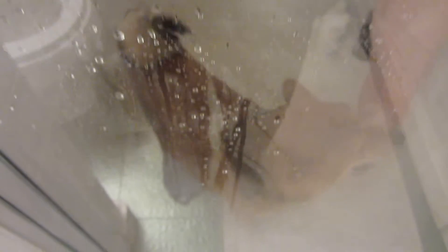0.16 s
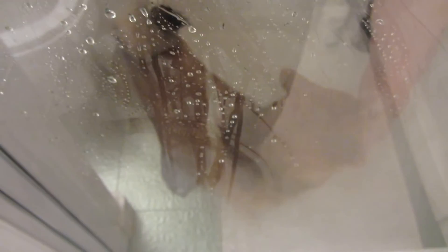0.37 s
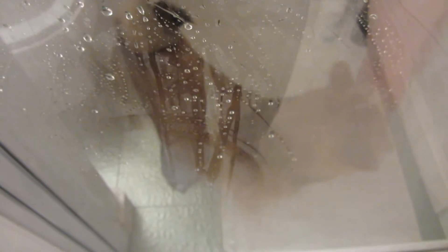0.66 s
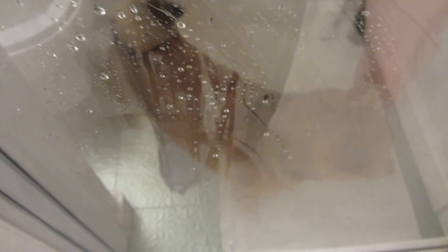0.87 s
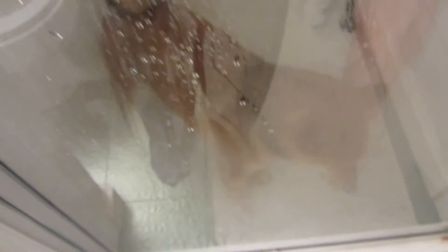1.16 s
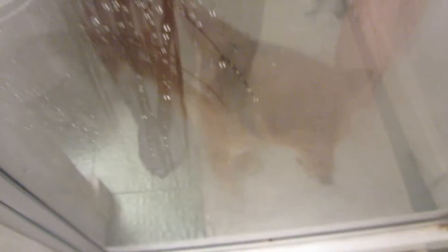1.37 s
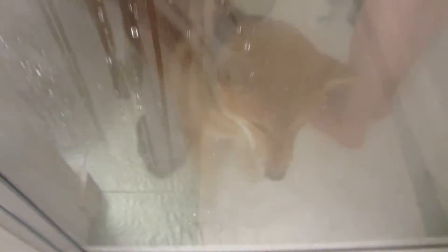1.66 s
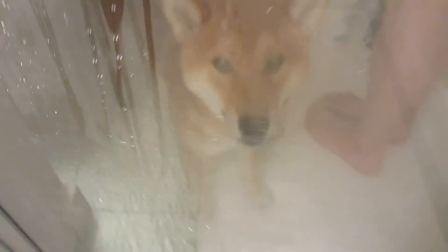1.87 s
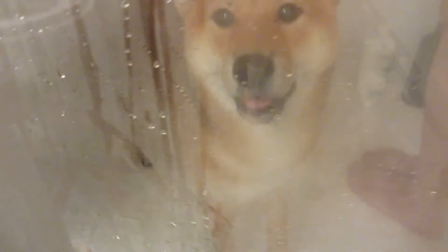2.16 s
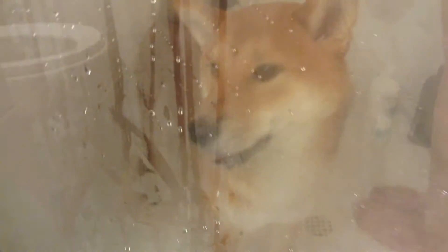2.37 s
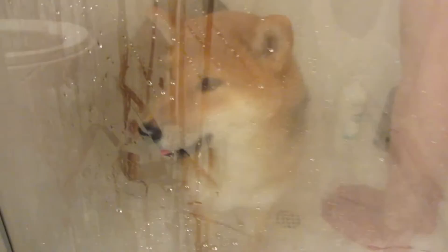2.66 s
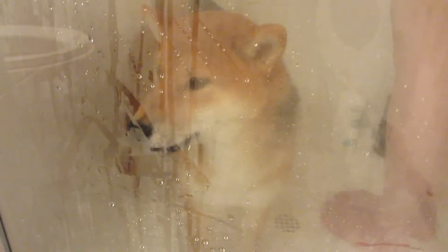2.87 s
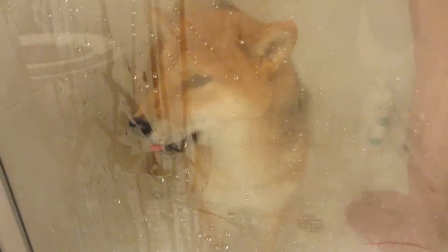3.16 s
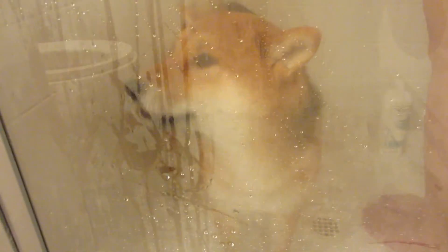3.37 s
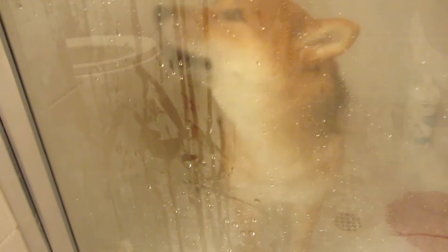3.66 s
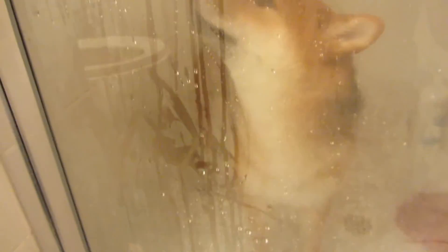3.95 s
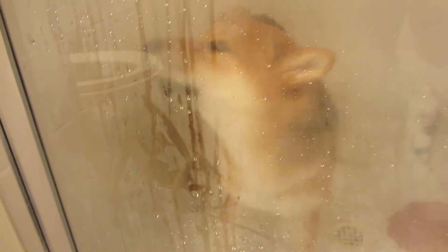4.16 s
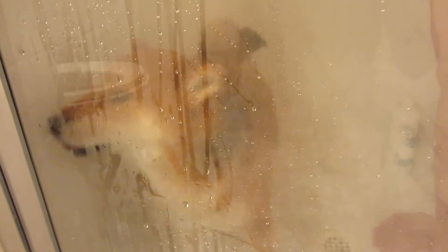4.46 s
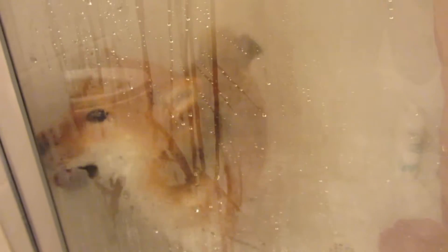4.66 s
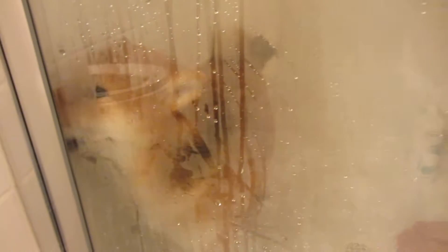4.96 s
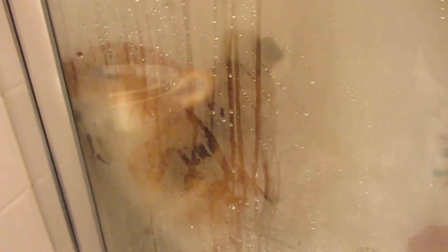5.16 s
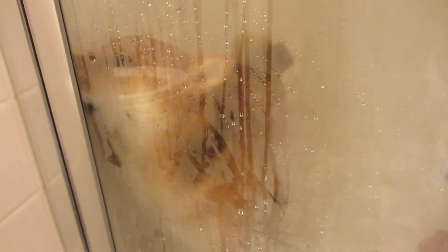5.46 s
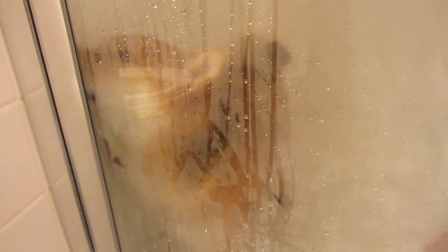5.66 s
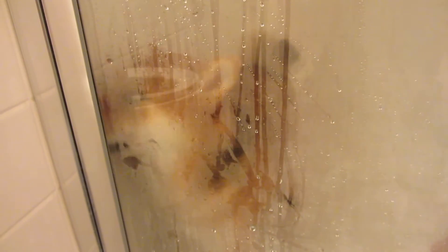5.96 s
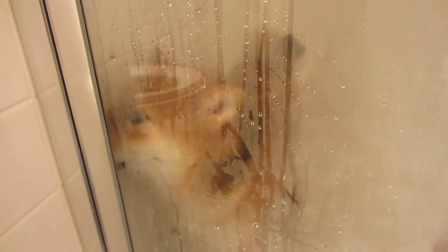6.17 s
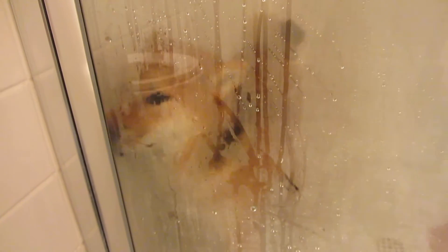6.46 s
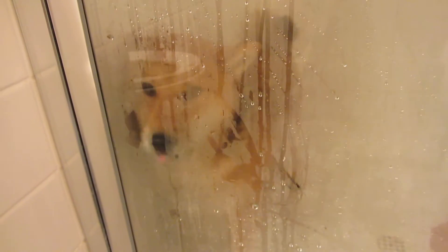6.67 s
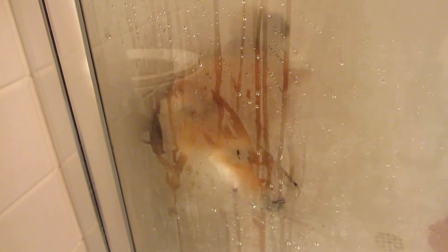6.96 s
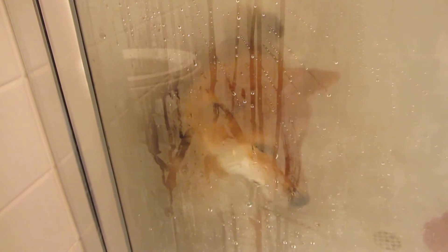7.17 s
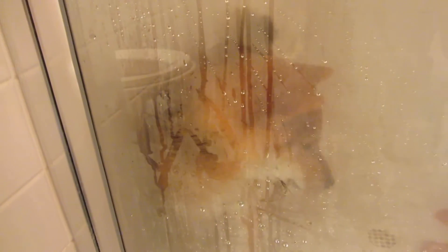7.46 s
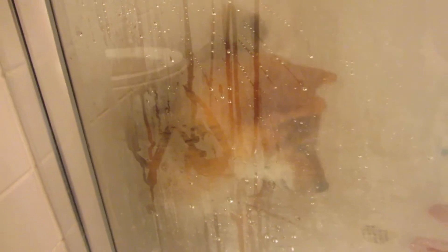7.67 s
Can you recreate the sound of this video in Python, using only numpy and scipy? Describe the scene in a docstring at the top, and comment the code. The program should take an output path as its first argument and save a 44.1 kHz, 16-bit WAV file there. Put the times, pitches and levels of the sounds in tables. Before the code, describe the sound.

A dog in a small tiled shower yelps in rapid, high, rising cries that ring off hard walls, pausing briefly twice, over a faint fan.

```python
"""A dog yelps in a tiled shower stall behind a glass door: short rising cries, some clear, some hoarse.
Each cry is a harmonic series from the vocal folds, weighted by throat resonances and mixed with breath noise;
it rings on as decaying stereo noise, the echoes between hard walls. Thin sine whistles come through the nose.
A fan rumbles (shaped noise) and hums (unsteady sines), water and huffs of breath hiss (shaped noise), a drop
ticks on the glass. The loudest sounds overload the microphone: gain control and a fast limiter press them down."""
import sys
import numpy as np
from scipy import signal
from scipy.fft import rfft, irfft, next_fast_len
from scipy.io import wavfile
from scipy.ndimage import uniform_filter1d, minimum_filter1d, map_coordinates

SR = 44100
rng = np.random.default_rng(int(sys.argv[2]) if len(sys.argv) > 2 else 0)


def master(y):
    """Save y as 16-bit WAV."""
    cut = np.clip(np.atleast_2d(y).T, -1, 1)
    pcm = np.round(cut * 32767)  # scale
    wavfile.write(sys.argv[1], SR, pcm.astype(np.int16))


N = 344417
TOP_HZ = 15720  # upper band limit


def amp(db):
    """Decibel definition: amplitude ratio of a level in dB."""
    return 10 ** (np.asarray(db) / 20)


def unit(x):
    """Normalization by power: x scaled to an rms of 1."""
    return x / np.sqrt(np.mean(x ** 2) + 1e-20)


def along(points, hz):
    """Logarithmic frequency scale: linear interpolation of (frequency [Hz], value) points over log frequency."""
    f, v = np.transpose(points)
    return np.interp(np.log(hz + 1), np.log(f + 1), v)


def wobble(rate, size):
    """Band-limited random fluctuation: a smooth curve through random knots, rate of them a second."""
    knots = rng.standard_normal(int(size * rate / SR) + 4)
    return map_coordinates(knots, [np.arange(size) * rate / SR])


def filtered(x, response):
    """Linear filtering: the spectrum of x times a response of frequency."""
    n = x.shape[-1]
    m = next_fast_len(n + 4096)
    return irfft(rfft(x, m) * response(np.fft.rfftfreq(m, 1 / SR)), m)[..., :n]


def spread(pair, alike):
    """Interaural coherence: two unrelated signals mixed as mid and side to a given left-right likeness."""
    def weights(hz):
        turn = np.arccos(np.clip(along(alike, hz), -1, 1)) / 2
        return np.array([np.cos(turn), np.sin(turn)])

    mid, side = filtered(pair, weights)
    return np.array([mid + side, mid - side])


def rush(spectrum, alike, patchy_db):
    """Turbulent noise: a shaped stereo spectrum of rms 1 whose patches in time and frequency vary in gain."""
    z = signal.stft(rng.standard_normal((2, N)), nperseg=512)[2]
    field = rng.standard_normal(z.shape[1:])
    field = uniform_filter1d(uniform_filter1d(field, 6, 0), 14, 1)  # smooth over frequency, then time
    pair = signal.istft(z * amp(patchy_db * unit(field)), nperseg=512)[1][:, :N]
    shaped = filtered(pair, lambda hz: amp(along(spectrum, hz)))
    return unit(spread(shaped, alike))


def gesture(s, first_hz, top_hz, last_hz, wait, rise, attack, held, whimper, db, mouth_db, hoarse, half,
            settled_db, sag_db):
    """Phonation control: rows of (time [s], pitch [Hz], level [dB], mouth opening [dB], hoarseness, half-pitch share)."""
    whimper = max(whimper, 0)
    t = np.arange(0, .44, .002)
    release_db_per_s, release_s = 698, .06
    end = held + release_s + whimper

    # pitch: the folds catch sharp, move to the top pitch, then drift to the last value
    catch, catch_s = .055, .012  # share of the first pitch, decay time
    rise_bend = .85  # below 1 the pitch moves fast at first
    drift_share, drift_bend = .45, 1.5  # time scale as share of the time left; above 1 starts late
    risen = np.clip((t - wait) / rise, 0, 1)
    since_top = t - wait - rise
    left = max(end - wait - rise, .01)
    drift = 1 - np.exp(-(np.maximum(since_top, 0) / (drift_share * left)) ** drift_bend)
    hz = first_hz * (1 + catch * np.exp(-t / catch_s))
    hz = hz + (top_hz - first_hz) * risen ** rise_bend + (last_hz - top_hz) * drift

    # level: attack, sagging hold, then a steep fall or a softer whimper
    onset_db = 26.5  # depth of the attack
    whimper_db, whimper_fade_db = 18.5, 19.5  # drop into the whimper, further loss by its end
    after = np.maximum(t - held, 0)
    fall_db = release_db_per_s * after
    if whimper > .01:
        whimper_fall_db = whimper_db + whimper_fade_db * (after / (end - held)) ** 2
        whimper_fall_db = whimper_fall_db + release_db_per_s * np.maximum(t - end, 0)
        fall_db = np.minimum(fall_db, whimper_fall_db)
    level = db - onset_db * np.maximum(1 - t / attack, 0) ** 2
    level = level - sag_db * np.clip(t - attack, 0, held) - fall_db
    level = level + wobble(35, SR)[::SR // 500][:len(t)]  # unsteady breath, in dB

    # mouth: gapes at first, changes its overtones at the top, closes towards the end of the hold
    gape_db, gape_s, close_db, close_s = 4, 0.011, 5, 0.061
    settled = np.clip(since_top / 0.018, 0, 1)
    closed = np.clip(1 + (t - held) / close_s, 0, 1)
    mouth = mouth_db + gape_db * np.exp(-t / gape_s) - settled_db * settled - close_db * closed

    clear_start = 0.58  # share of the roughness before the pitch has risen
    strain = clear_start + (1 - clear_start) * risen
    return np.transpose([s + t, hz, level, mouth, hoarse * strain, half * risen])


def cry(rows, slope_db, treble_db, length):
    """Source-filter principle: fold harmonics and breath noise through the throat; flutter and subharmonics roughen."""
    # throat resonances: (frequency at length ratio 1 [Hz], gain [dB])
    throat_points = [(100, -61.5), (300, -24), (450, -7.5), (600, 0.5), (1000, 1.5), (1500, -0.5),
                     (2500, 5.5), (3300, -3), (4200, -26.5), (5100, -31), (6200, -32), (8000, -38.5),
                     (10500, -48.5), (12000, -60.5), (14000, -64), (16000, -66)]
    # breath hissing past the teeth: (frequency [Hz], relative level per Hz [dB])
    rasp_points = [(3000, -31.5), (4200, -1), (7000, -1.5), (10300, -9.5), (11300, -22.5), (14000, -24),
                   (15500, -35.5)]
    s, *cols = np.transpose(rows)
    t = np.arange(s[0], s[-1], 1 / SR)
    hz, db, mouth_db, hoarse, half = (np.interp(t, s, c) for c in cols)
    hoarse = np.clip(hoarse, 0, 1)
    phase = 2 * np.pi * np.cumsum(hz) / SR
    wander = 2 * np.pi * np.cumsum(hz * 0.15 * hoarse * wobble(220, len(t))) / SR

    # harmonic numbers in half steps; the halves appear when every second beat differs
    k = np.arange(1, 50)[:, None] / 2
    share = np.where(k % 1, np.abs(half) * (k > 1), 1)
    loudest_db = np.maximum.accumulate(db)
    effort_db = 0.47 * (loudest_db + 12.5) * np.log2(np.maximum(k / 2, 1))  # dull until the cry has built up
    treble = along([(3600, 0), (4300, 1)], k * hz * length)  # above the muzzle's cut-off
    facing_db = slope_db * np.log2(np.clip(k / 2, 1, 3)) + treble_db * treble
    fading_db = 0.18 * (loudest_db - db) * treble  # the thin treble outlasts the body of the cry
    throat_db = along(throat_points, k * hz * length)
    gain = share * amp(throat_db + mouth_db * (k > 1) + effort_db + facing_db + fading_db)
    gain *= k * hz < TOP_HZ
    gain *= amp(3.5 * rng.standard_normal(k.shape) * (k > 4))  # high overtones come out uneven

    flutter = np.where(k > 1, 1, .25) * wander  # the lowest tone gets a quarter of the pitch flutter
    partials = gain * np.sin(k * (phase + flutter) + 0.35 * k ** 2)
    tone = np.sum(partials, axis=0) * np.sqrt(2 / np.sum(gain ** 2, axis=0))  # about rms 1
    tone *= amp(8.5 * hoarse * wobble(350, len(t)))

    puffs = rng.standard_normal(len(t)) * (1 + np.cos(phase + wander))  # turbulence puffs once a cycle
    rasp = amp(-41 + mouth_db / 3) * unit(filtered(puffs, lambda f: amp(along(rasp_points, f))))
    tilt = [(500, -16.0), (1500, 5.0)]  # (frequency [Hz], gain [dB])
    air = unit(filtered(puffs, lambda f: amp(along(throat_points, f * length) + along(tilt, f))))
    burst = 0.66 * amp(-60 * (t - s[0]) / 0.06)  # the folds part with a puff of air
    air_gain = 0.19 * hoarse * amp(mouth_db / 2) + burst
    voice = np.sqrt(1 - hoarse ** 2) * tone + air_gain * air + rasp
    return amp(db) * voice * np.minimum((t - s[0]) / .002, 1)


def in_stall(out, s, x, direct_db):
    """Reverberation: out plus x and its decaying diffuse echoes; the dog moves, so every call draws new echoes."""
    # decay in the stall: (frequency [Hz], time to fall by 60 dB [s])
    decay_points = [(300, 0.47), (1000, 0.36), (3000, 0.28), (6000, 0.37), (10000, 0.28)]
    # left-right likeness of the echoes: (frequency [Hz], correlation [-1 to 1])
    echo_likeness = [(300, 0.81), (800, 0.68), (2000, 0.26), (5000, -.1)]
    hz, t, z = signal.stft(rng.standard_normal((2, SR * 3 // 4)), SR, nperseg=256)
    decay = amp(-60 * t / along(decay_points, hz)[:, None])
    tail = signal.istft(z * decay, SR, nperseg=256)[1]
    tail = spread(tail / np.linalg.norm(tail[0]), echo_likeness)
    tail[:, 0] += amp(direct_db)  # direct sound
    wet = signal.fftconvolve(x[None], tail, axes=1)
    start = round(s * SR)
    padding = ((0, 0), (start, max(N - start - wet.shape[1], 0)))
    return out + np.pad(wet, padding)[:, :N]


def dog_cries():
    """Superposition: the fading echo of an earlier cry, then the cries, each ringing in the stall."""
    # one row per cry; the first, at 0 s, is the fading echo of a cry before the start:
    #   (start [s], first pitch [Hz], top pitch [Hz], last pitch [Hz], wait before the rise [s],
    #   rise [s], attack [s], held until after the start [s], whimper length [s], level [dB],
    #   mouth opening as overtone gain [dB], hoarseness [0-1], half-pitch share [0-1],
    #   overtone slope [dB per octave], treble gain above the muzzle's cut-off [dB], throat length [ratio],
    #   overtone loss once at the top [dB], sag while held [dB per s])
    cry_rows = [ (0, 747, 689, 684, .002, 0.0033, 0.0029, .003, 0, -26.5, -17, 0, 1, 6.5, 9.5, 0.98, -1, 45),
                (0.186, 811.4, 1085, 978, .028, .045, 0.042, 0.11, .17, -14, 3.5, .25, 0, 5.5, -3.5, 1.01, 18, 61.5),
                (.565, 819.5, 958.8, 1003, .025, .025, 0.046, 0.083, 0.17, -13.5, -2.5, .06, 0, 7, -4.5, 0.97, 2, 11),
                (0.971, 823, 959, 995, 0.031, 0.042, 0.047, .09, 0.15, -10, -6, 0.1, 0, 5, -4, 1.016, 3, 90.5),
                (1.32, 789.6, 961.6, 711.6, .035, .04, 0.041, .105, 0.22, -12, -2.5, .05, .05, 2.5, -1.5, 0.99, 18.5, 29.5),
                (1.598, 738, 688, 592, 0.023, 0.04, 0.074, 0.1, .1, -33.5, -19, 0.11, 0.3, 12, 17, 1.2, 8, 42),
                (1.953, 461.4, 425, 371, 0.0185, 0.0336, 0.013, 0.123, 0.036, -41, -11, 0.2, 0.36, 1.5, 7, 0.76, 3, 63),
                (2.384, 449.4, 477.4, 438, .04, 0.041, 0.025, 0.073, 0, -24, 1, 0.13, 0.23, 0.5, 9, 0.94, 7.5, 67.5),
                (2.781, 566.6, 804.6, 789, .022, .1, 0.058, 0.11, 0.063, -12, 6, .32, 0.17, -5.5, 6, 0.93, 2.5, 53),
                (2.97, 695.3, 829.5, 841, .005, 0.087, 0.057, 0.1, 0.065, -12.5, -1, .08, 0.07, -2, 10, 0.98, 0.5, 19),
                (3.273, 771.6, 1158, 1110, .035, .045, 0.044, 0.14, 0.075, -8, -1.5, .24, 0.1, 4, -4, 1.028, 19, 76),
                (3.501, 730.5, 800, 738.6, 0.0093, .09, 0.064, .145, 0.022, -24, -6, 0.2, 0.02, 5, 5, .93, -1, 53),
                (3.815, 815.8, 1059, 988.5, .048, .02, 0.053, 0.13, 0, -9.5, 0.5, .2, 0.3, .5, 1, 1.04, 13, 70.5),
                (4.027, 777, 856, 817, 0.029, .05, 0.051, 0.1, 0.18, -14.5, 12.5, 0.11, 0, -12.5, 12.5, 0.84, 2.5, 59.5),
                (4.319, 875, 1023, 1007, .022, .07, 0.044, 0.11, 0.089, -10, -5, 0.3, 0.6, 4, -2.5, 1.07, 12.5, 41.5),
                (4.681, 801, 1047, 1039, .024, .04, 0.041, 0.071, 0, -8, -5, .18, 0, 0.5, -4, .99, 1, 18.5),
                (4.969, 720.4, 823.3, 763, .04, 0.049, 0.061, 0.12, 0, -13, -8, .07, 0.01, -0.5, 2, 1.07, 3, 47),
                (5.231, 578, 718.4, 738, .035, .05, 0.096, 0.091, 0, -11, 0.5, 0, 0.05, -3, -7, 1.073, 13, 29),
                (5.819, 559.7, 624, 626.5, 0.027, .06, 0.063, 0.068, 0.13, -16.5, -6.5, 0.06, 0.08, 2.5, 1.5, 1.006, 7, 26.5),
                (6.07, 622.5, 947, 883, .022, .028, 0.069, 0.092, .04, -7.5, 0, 0.3, .55, -5.5, 4.5, 0.99, 10, 97.5),
                (6.343, 700.6, 833.7, 591, .025, .035, 0.054, 0.094, 0.17, -11, 0.5, .1, 0.03, -2, 3.5, 1.06, 4.5, 66.5),
                (6.84, 528.4, 566.5, 595, 0.015, 0.094, 0.031, 0.096, 0.35, -28.5, -5.5, 0.09, 0.12, -12, 6, 0.96, 5, 36),
                (7.082, 564.4, 596, 545, .06, 0.067, .11, 0.13, 0.064, -45, -26, 0, .1, -9, 6, 1.2, -2, 53),
                ]
    out = np.zeros((2, N))
    for *course, slope_db, treble_db, length, settled_db, sag_db in cry_rows:
        rows = gesture(*course, settled_db, sag_db)
        out = in_stall(out, course[0], cry(rows, slope_db, treble_db, length), direct_db=-8.0)
    return out


def fan_rumble():
    """Flow noise: broadband turbulence with the fan's spectrum."""
    # fan spectrum: (frequency [Hz], relative level per Hz [dB])
    fan_points = [(20, -47.5), (60, -1), (120, -2.5), (220, -1.5), (400, 1), (650, -3.5), (1000, -4),
                  (1600, -9.5), (2500, -17.5), (3700, -22), (5500, -27.5), (8000, -23.5), (10000, -18.5),
                  (12000, -33), (15700, -37)]
    # left-right likeness: (frequency [Hz], correlation [-1 to 1])
    fan_likeness = [(60, 0.12), (150, 0.28), (400, 0.75), (1000, 1), (5000, 0.41)]
    return amp(-62) * rush(fan_points, fan_likeness, patchy_db=1.5)


def water_and_breath_hiss():
    """Amplitude modulation of flow noise: the water's slowly changing hiss and short huffs of the dog's breath."""
    # spectrum of both: (frequency [Hz], relative level per Hz [dB])
    hiss_points = [(300, -28), (800, -9), (1600, -0.5), (2500, 0), (3700, -4), (5500, -5.5), (8000, -9),
                   (10000, -18.5), (12000, -19.5), (14000, -23), (15700, -26.5)]
    # course of the water's hiss: (time [s], level before the flicker [dB])
    water_course = [(0, -77), (2.602, -66), (3.001, -63), (5.7, -79), (6.4, -61), (6.55, -56), (6.96, -53),
                    (7.26, -55), (7.521, -62), (7.62, -65.5), (7.81, -60)]
    # short huffs of the dog's breath: (time [s], peak level before the flicker [dB], half-width to 1/e [s])
    breath_swells = [(1.5, -58, .15), (2.068, -59, .06), (5.562, -64.5, 0.081), (7.408, -51.5, 0.087)]
    now = np.arange(N) / SR
    times, levels = np.transpose(water_course)
    strength = amp(np.interp(now, times, levels))
    for s, db, width in breath_swells:
        strength += amp(db) * np.exp(-((now - s) / width) ** 2)
    strength *= amp(.5 * wobble(6.6, N))
    return strength * rush(hiss_points, [(800, .2), (4000, 0)], patchy_db=.6)


def motor_hum():
    """Tonal radiation: the fan motor's sines, unsteady in pitch and level, out of phase left to right."""
    # motor tones: (mean frequency [Hz], level before the wobble [dB])
    hum_tones = [(118, -69.5), (140, -79.5), (240, -70.5)]
    out = np.zeros((2, N))
    for hz, db in hum_tones:
        phase = 2 * np.pi * np.cumsum(hz * (1 + 0.0057 * wobble(8.6, N))) / SR
        out += amp(db + 4 * wobble(8.5, N)) * np.sin(phase + [[0], [1.9]])
    return out


def nose_whistles(out):
    """Aeroacoustic tone: thin whistles through the nose, sines of flickering pitch and level, added to out."""
    # whistles: (start [s], mean pitch [Hz], level before flicker and echoes [dB], length [s])
    whistle_rows = [(0.431, 4940, -59.5, 0.038), (1.527, 4670, -61, 0.15), (1.638, 4580, -67, 0.15),
                    (2.55, 5630, -62, 0.057), (5.435, 6140, -55, 0.086), (5.522, 4670, -59, 0.094)]
    for s, hz, db, length in whistle_rows:
        t = np.arange(0, length, 1 / SR)
        pitch = hz * (1 + 0.006 * wobble(150, len(t)))
        flicker = amp(3 * wobble(90, len(t)))
        tone = np.sin(2 * np.pi * np.cumsum(pitch) / SR)
        whistle = amp(db) * flicker * np.hanning(len(t)) * tone
        out = in_stall(out, s, whistle, direct_db=-2.0)
    return out


def glass_drips(out):
    """Impact excitation: a drop on the glass is a short decaying burst of filtered noise, added to out."""
    # drops: (time [s], level before the tick's filter and echoes [dB])
    drip_rows = [(1.996, -52)]
    tick_points = [(2500, -32), (4500, 9.5), (10500, -0.5), (12500, -19)]  # (frequency [Hz], gain [dB])
    t = np.arange(SR // 50) / SR
    for s, db in drip_rows:
        tick = filtered(rng.standard_normal(len(t)), lambda hz: amp(along(tick_points, hz)))
        tick *= amp(db - 60 * t / 0.011)
        out = in_stall(out, s, tick, direct_db=5)
    return out


def scene():
    """Superposition: the dog's voice, slightly louder on the right, over the fan, the hiss and the drop."""
    voice = nose_whistles(dog_cries())
    background = glass_drips(fan_rumble() + water_and_breath_hiss() + motor_hum())
    return voice * amp([[-.3], [.3]]) + background


def record(dry):
    """Dynamic compression: low cut, gain control, a limiter dipping on single wave tops, then the band limit."""
    cut = filtered(dry, lambda hz: hz ** 2 / (hz ** 2 + 45 ** 2))
    # gain control: level where it sets in, power of the excess taken off, window [s]
    knee, squeeze, look_s = .45, .38, .008
    span = round(look_s * SR)
    tops = -minimum_filter1d(-np.abs(cut).max(0), size=span)
    cut = cut * uniform_filter1d(np.maximum(tops / knee, 1) ** -squeeze, size=span)
    # limiter: each channel's gain follows its own peaks
    needed = np.minimum(1, .655 / np.abs(cut + 1e-9))
    gain = uniform_filter1d(minimum_filter1d(needed, size=27), size=27)  # windows in samples
    return filtered(cut * gain, lambda hz: hz < TOP_HZ)


dry = scene()
out = record(dry)
master(out)
```